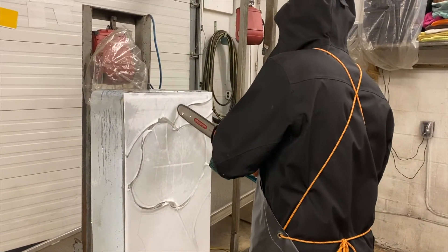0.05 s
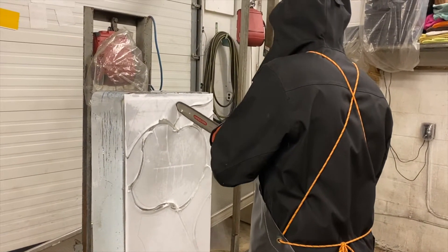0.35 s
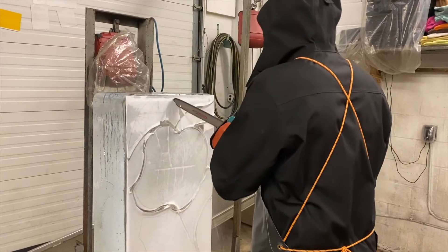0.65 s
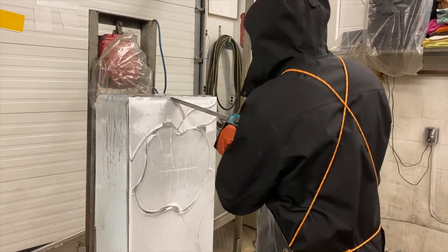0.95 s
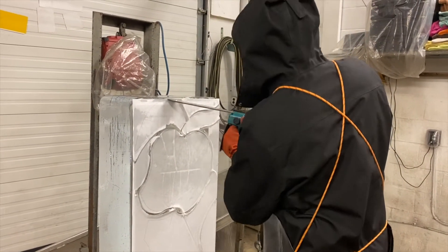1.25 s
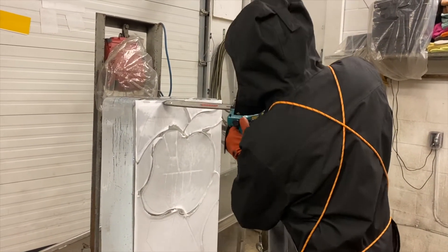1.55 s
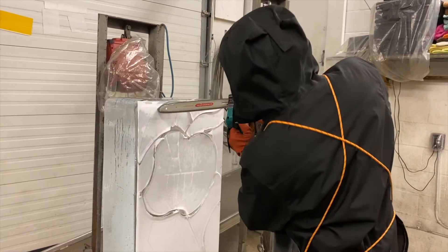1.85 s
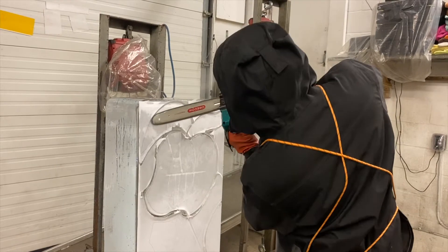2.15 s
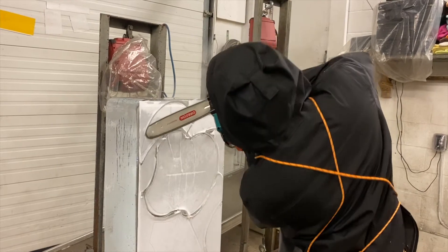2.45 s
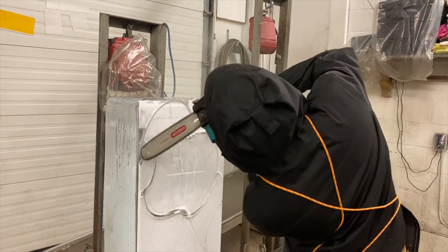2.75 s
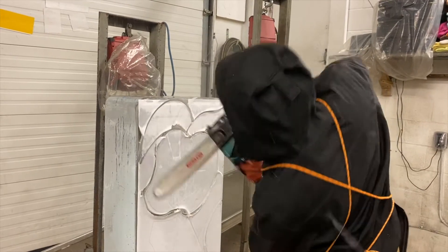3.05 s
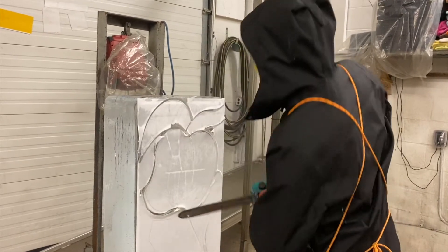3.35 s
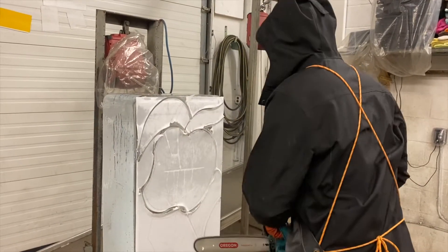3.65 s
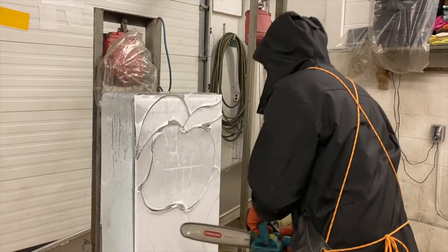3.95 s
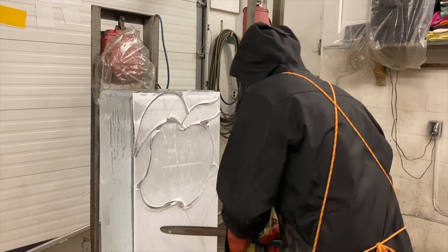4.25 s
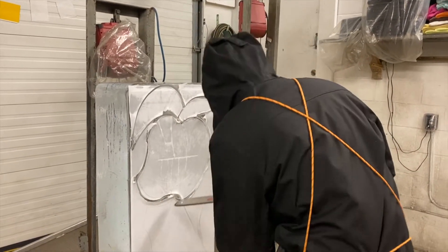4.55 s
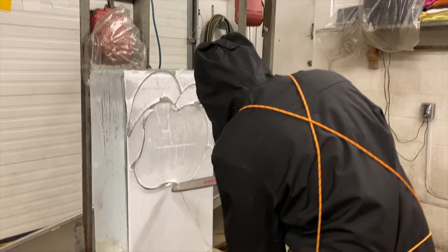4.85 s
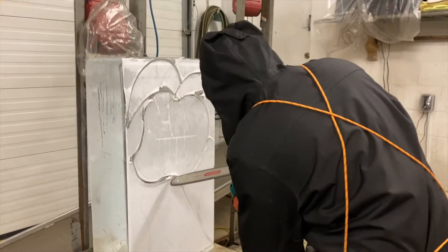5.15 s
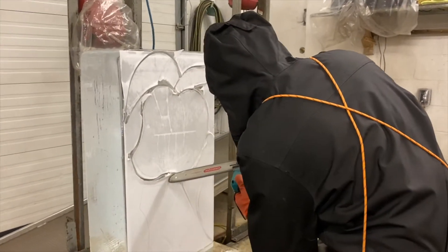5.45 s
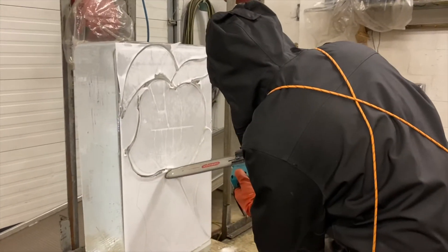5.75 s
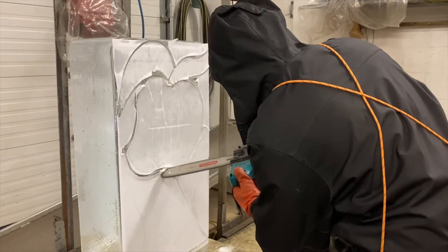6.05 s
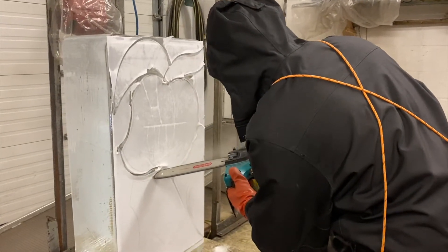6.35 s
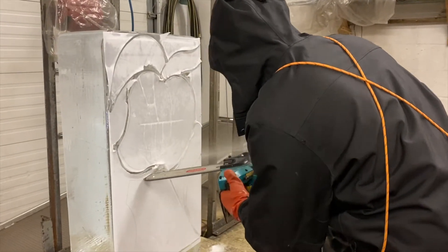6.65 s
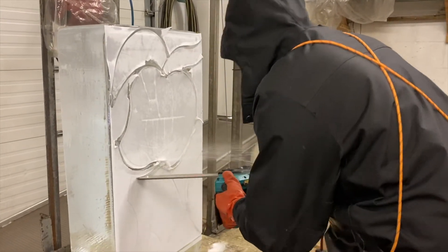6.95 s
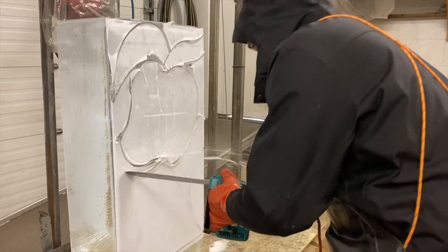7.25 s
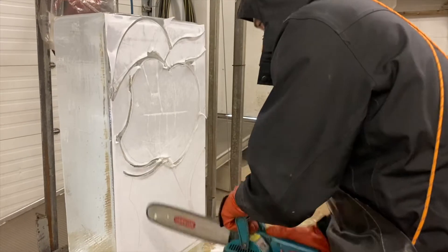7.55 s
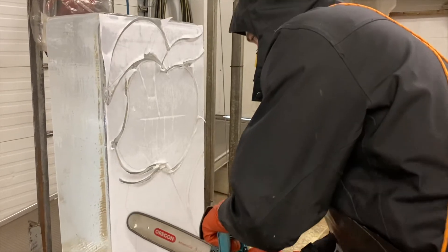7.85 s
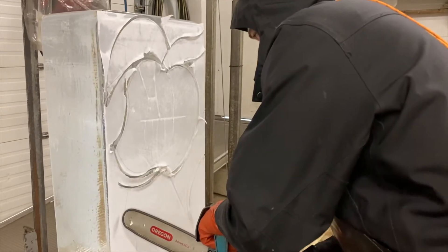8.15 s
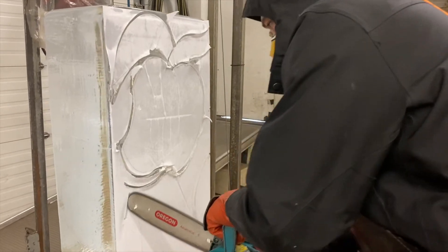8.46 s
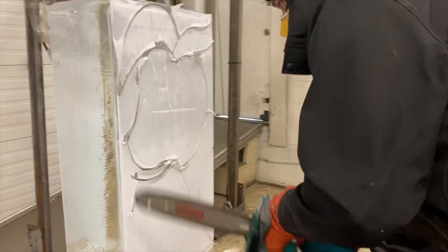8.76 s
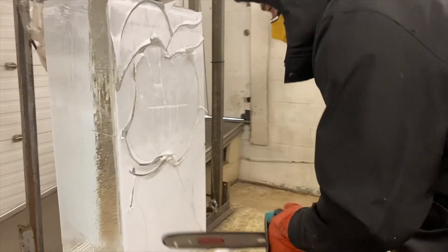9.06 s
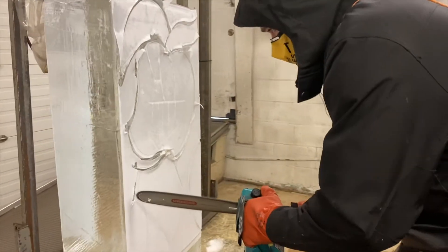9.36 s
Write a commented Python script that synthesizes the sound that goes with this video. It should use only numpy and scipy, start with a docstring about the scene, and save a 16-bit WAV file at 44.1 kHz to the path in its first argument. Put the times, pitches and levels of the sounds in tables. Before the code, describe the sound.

Close by in a workshop, an electric chainsaw runs through ice, its whine swelling and fading over metallic rattling and a fine spray of chips. The trigger is let go three times: first a longer sag in pitch and level, later a tiny dip, then a short one, and each time the motor quickly picks up again. The hard walls add a tight echo, with faint hum and low room rumble behind.

```python
"""An electric chainsaw carves a block of ice in a hard-walled workshop, about a metre and a half away.
Periodic impacts of chain on sprocket make a whine, which the mains ripple modulates into sidebands.
Friction and knocks excite the modes of bar and housing, and the cutters throw a hiss of ice chips.
Three times the trigger is let go: pitch and level sag, then recover as the motor spins up.
Mains hum and the low rumble of the room lie underneath."""
import sys
import numpy as np
from scipy import signal
from scipy.fft import rfft, irfft, next_fast_len
from scipy.io import wavfile

SR = 44100
rng = np.random.default_rng(int(sys.argv[2]) if len(sys.argv) > 2 else 0)


def store_wav(level_fs):
    """Save 16-bit WAV to argv[1]."""
    pcm = np.round(np.clip(np.atleast_2d(level_fs), -1, 1) * 32767)
    wavfile.write(sys.argv[1], SR, pcm.T.astype(np.int16))


N = 422919
T = np.arange(N) / SR
SIZE = next_fast_len(N + SR)
FREQS = np.maximum(np.arange(SIZE // 2 + 1) * SR / SIZE, 1)


# Speed under power, sagging with the load. Each row: time in seconds, links per second.
POWERED_RATE = [(0.0, 651.5), (0.75, 636.5), (1.3, 639.3), (1.9, 648.0), (2.8, 637.2), (4.3, 651.5),
                (4.7, 657.5), (5.0, 662.3), (5.7, 662.5), (6.2, 651.4), (7.28, 637.2), (8.15, 655.3),
                (8.55, 642.1), (9.59, 650.6)]
# Trigger releases. Each row: time let go and time pulled again, in seconds.
TRIGGER_RELEASES = [(2.812, 3.726), (7.32, 7.43), (8.524, 8.848)]

def chain_speed(coast_s=1.118, spin_up_s=0.219):
    """Inertia: speed decays and recovers exponentially. Gives links per second and share of full speed."""
    share = 1
    for let_go, pulled in TRIGGER_RELEASES:
        lost = 1 - np.exp(-np.clip(T - let_go, 0, pulled - let_go) / coast_s)
        share = share * (1 - lost * np.exp(-np.maximum(T - pulled, 0) / spin_up_s))
    return in_time(POWERED_RATE)[0] * share, share


# The whine swells and fades as the saw is turned. Each row: time in seconds, relative level in dB.
MESH_LEVEL = [(0, -33), (0.37, -29), (0.48, -41), (0.68, -35), (0.9, -43), (1.2, -31.5), (1.5, -39),
              (2.3, -31), (2.5, -35), (2.8, -27.5), (3.0, -33), (3.12, -34), (3.9, -32), (4.4, -29),
              (4.52, -31), (4.62, -25.5), (4.77, -21.5), (4.92, -26), (5.1, -28), (5.25, -25), (5.45, -27),
              (5.6, -26.5), (5.72, -31), (5.82, -26.5), (6.05, -29), (6.22, -43), (6.48, -31), (6.9, -27),
              (7.3, -29.5), (7.55, -39), (7.7, -31), (8.05, -27), (8.4, -35), (8.62, -31), (8.79, -24.5),
              (8.9, -34), (9.0, -29), (9.25, -34), (9.45, -26), (9.59, -33)]
# Upper sidebands. Each row: time in seconds, relative level in dB.
SIDEBAND_LEVEL = [(0, -43), (0.4, -42), (0.8, -52), (1.12, -39), (1.35, -46), (1.63, -39), (1.85, -50),
                  (2.15, -41), (2.7, -42), (2.92, -35), (3.1, -42), (3.7, -39), (4.0, -35), (4.15, -27),
                  (4.35, -33), (4.55, -38), (5.3, -36.5), (5.7, -39), (6.5, -37), (7.0, -40), (7.5, -38),
                  (7.85, -26), (8.02, -31), (8.2, -26.5), (8.58, -29.5), (8.8, -38), (9.1, -31), (9.3, -32),
                  (9.59, -43)]
# Width as the saw moves. Each row: time in seconds, half the phase between the ears in radians.
MESH_SKEW = [(0, 0.67), (1.6, 0.7), (2, 0.28), (4.8, 0.5), (5.3, 1.0), (5.6, 0.7), (6.1, 0.5), (6.95, 0.15),
             (7.2, 0.6), (8.3, 0.95), (8.7, 0.47)]
# The chain jumps on the sprocket and the whine dips. Each row: time and half width in seconds.
CHAIN_JUMPS = [(1.46, .05), (2.48, .04), (4.22, .022), (4.33, .018), (4.48, .018), (4.59, .025),
               (6.39, .03), (7.14, .03), (7.75, .025), (7.83, .008), (7.93, .024), (8.07, .013),
               (8.24, .018), (8.32, .008), (8.39, .02), (8.72, .018), (8.86, .02), (8.97, .025),
               (9.21, .03), (9.33, .014)]

def whine(links, slack, free, speed_db, rattle_db, flutter_db=2, jump_db=-11):
    """Modulation: two rivets a link strike the sprocket, and mains ripple adds sidebands to that tone."""
    mesh, ripple = 2 * links, RIPPLE_HZ * T
    mesh_db = in_time(MESH_LEVEL)[0] + 3.7 * speed_db
    upper_db = in_time(SIDEBAND_LEVEL)[0] + 2.3 * speed_db
    lower_db = rattle_db - 12 + 2.3 * speed_db
    skew, = in_time(MESH_SKEW)
    flap = FLAP * slack
    out = from_db(mesh_db + 0.5) * tone(mesh, scatter=0.1 + flap, scatter_hz=28, skew=skew)
    out += from_db(upper_db + 1) * tone(mesh + ripple, scatter=0.35 + flap, scatter_hz=25)
    out -= from_db(lower_db) * tone(mesh - ripple, scatter=0.6 + flap, scatter_hz=11)
    out += from_db(upper_db - 16) * tone(mesh + 2 * ripple, scatter=0.5 + flap, scatter_hz=26)
    flutter = flutter_db * free * drift(25)
    dips = swells([(s, width, jump_db) for s, width in CHAIN_JUMPS])
    return out * from_db(flutter + dips + slack_loss_db(slack))


RIPPLE_HZ = 120
FLAP = 1.5   # scatter that a flapping chain adds per unit of slack

def slack_loss_db(slack):
    """Loss of periodicity: past a threshold of slack, the steady tones fade."""
    return -35 * np.maximum(slack - 0.19, 0)


# Swells of the octave. Each row: time and half width in seconds, level at full speed in dB.
OCTAVE_LEVEL = [(0.5, .06, -40.5), (0.8, .2, -35), (1.42, .17, -40.5), (2.2, .22, -41.5),
                (2.72, .13, -42.5), (3.2, .22, -39), (4.68, .08, -35), (5.0, .13, -32), (5.3, .1, -36.5),
                (5.78, .08, -39), (6.3, .2, -35.5), (6.76, .09, -33.5), (7.12, .17, -37), (8.15, .25, -38),
                (8.76, .09, -28), (9.25, .28, -33.5)]

def whine_octave(links, slack, speed_db):
    """Harmonics: periodic impacts also sound at twice the meshing frequency."""
    level = swells_db(OCTAVE_LEVEL) * from_db(1.5 * speed_db)
    return level * tone(4 * links, scatter=0.3 + FLAP * slack, scatter_hz=30, skew=0.3)


# Spectrum of the scraping links. Each row: frequency in Hz, relative density in dB.
SCRAPE_SPECTRUM = [(400, -23), (900, -7), (1200, 4), (1700, 3.5), (2000, 3.5), (2400, 3.5), (3000, -1),
                   (3400, -1), (4000, -0.5), (4800, 2), (6000, -15), (7500, -5.5), (10000, -114)]

def chain_rattle(links, rattle_db, bar_db):
    """Impact excitation: each link scrapes and knocks in the groove, setting bar and housing ringing."""
    knocks = from_db(1.8 * np.cos(2 * np.pi * links) + 0.74 * drift(14.5))
    metal = fine_modes(depth_db=2.1, spacing_hz=45)
    scrape = from_db(rattle_db + 1.87) * stereo_noise(metal * from_db(over_hz(SCRAPE_SPECTRUM)), knocks)
    ring = from_db(rattle_db - 2.0) * stereo_noise(saw_body(), knocks)
    bar = from_db(bar_db + 1) * stereo_noise(metal * resonance(5400, 750) ** 2, knocks)
    # the upper ring of the bar faces the left ear
    lean_db = over_hz([(2000, 0.09), (3000, 1.8), (5200, 1.2), (6200, 0.75)])
    return filtered(scrape + ring + bar, from_db([lean_db, -lean_db]))


# Modes of bar and housing. Each row: frequency in Hz, bandwidth in Hz, relative gain in dB.
BODY_MODES = [(641, 40, -8), (1293, 120, 2.5), (1445, 310, -2), (1800, 70, -9.5), (1937, 76, -5),
              (2157, 120, -2.5), (2782, 72, 1.5), (2977, 57, 0), (3105, 41, 2.5), (3590, 100, -6.5),
              (3740, 52, -9), (5560, 200, -7.5), (6220, 44, 0)]

def saw_body():
    """Modal superposition: the modes respond in parallel, with alternating signs."""
    return sum((-1) ** k * from_db(db) * resonance(hz, width)
               for k, (hz, width, db) in enumerate(BODY_MODES))


def fine_modes(depth_db, spacing_hz):
    """Modal overlap: crowded small modes of bar and housing ripple the spectrum."""
    knots = np.arange(0, SR / 2, spacing_hz)
    heights = rng.standard_normal(4096)[:len(knots)]
    return from_db(depth_db * np.interp(FREQS, knots, heights))


# Spectrum of the flying chips. Each row: frequency in Hz, relative density in dB.
CHIP_SPECTRUM = [(3500, -46), (5500, -2.5), (6500, 0.5), (7200, 1), (7800, 6), (8400, -2.5), (9400, -0.5),
                 (10500, 3.5), (12000, -0.5), (13200, 2), (14300, -0.5), (15700, -4)]

def ice_spray(links, spray_db, lag_ms=0.2225):
    """Amplitude-modulated noise: a cutter on every second link shaves off chips in uneven bites."""
    bites = from_db(0.4 * np.cos(np.pi * links) + 0.64 * drift(36) + 0.098 * drift(15))
    hiss = filtered(rng.standard_normal(N) * bites, from_db(over_hz(CHIP_SPECTRUM)))
    right = from_db(spray_db + 8.5) * rms_one(hiss)
    # an inverted, slightly late copy widens the hiss
    left = -filtered(right, np.exp(-2j * np.pi * FREQS * lag_ms / 1000))
    return np.array([left, right])


# The motor's low tone. Each row: time in seconds, level at full speed in dB.
MOTOR_TONE_LEVEL = [(0, -45), (1.0, -48.5), (2.7, -49.5), (3.0, -46), (3.2, -53), (3.9, -52), (4.35, -44.5),
                    (4.8, -47.5), (5.6, -47.5), (6.2, -54), (7.4, -53), (8.2, -51), (9.0, -52), (9.59, -47)]
# Sprocket tones. Each row: multiple of the link rate, relative level in dB.
SPROCKET_ORDERS = [(2.333, -16), (2.667, -22), (3, -18), (4.333, -15), (4.667, -19), (5, -18), (5.333, -17),
                   (6, -16), (7, -20), (9.333, -21)]

def drive_tones(links, slack, speed_db, rattle_db):
    """Rotational orders: motor and sprocket sound at set multiples of the link rate."""
    motor_db = in_time(MOTOR_TONE_LEVEL)[0] + 2 * speed_db + slack_loss_db(slack)
    motor = from_db(motor_db) * tone(1.01 * links, scatter=0.25, scatter_hz=6)
    buzz = sum(from_db(db) * tone(order * links, scatter=1, scatter_hz=7)
               for order, db in SPROCKET_ORDERS)
    return motor + from_db(rattle_db + speed_db) * buzz


def bar_song(links, slack, bar_db, held_bar_db, order=13 / 3):
    """Forced vibration: free of the cut, the bar sings one order of the drive through its modes."""
    excess = np.maximum(from_db(bar_db) - from_db(held_bar_db), 0)
    song = excess * tone(order * links, scatter=1, scatter_hz=35)
    return filtered(from_db(2.5 - 25 * slack) * song, saw_body())


# Squeals as the saw slows or picks up. Each row: time and half width in seconds, pitch in Hz, level in dB.
SLACK_SQUEALS = [(3.03, .05, 2135, -32), (3.06, .035, 3070, -42), (3.21, .035, 1790, -40),
                 (3.37, .06, 3030, -43), (3.5, .2, 5580, -50), (3.88, .06, 2850, -37),
                 (8.77, .06, 3050, -39), (9.03, .06, 2135, -35)]

def squeals(share, bend_power=0.35):
    """Resonance: the slack chain squeals near a mode of the housing, its pitch bent by changing speed."""
    out = 0
    for s, width, hz, db in SLACK_SQUEALS:
        pitch = hz * (share / np.interp(s, T, share)) ** bend_power
        squeal = tone(np.cumsum(pitch) / SR, scatter=0.45, scatter_hz=50, skew=0.3)
        out = out + swells_db([(s, width, db)]) * squeal
    return out


# A narrow rasping ring near 4.5 kHz swells and fades. Each row: time and half width in seconds, level in dB.
RASP_SWELLS = [(1.8, 1.2, -50), (4.1, .25, -46), (5.1, .5, -43), (6.3, .6, -41.5), (9.45, .25, -42)]

def groove_ring():
    """Frictional excitation: the bar rubs the walls of its groove and rings in one narrow, rasping band."""
    return swells_db(RASP_SWELLS) * stereo_noise(resonance(hz=4540, width_hz=190) ** 2)


# Spectrum of the housing. Each row: frequency in Hz, relative density in dB.
HOUSING_SPECTRUM = [(90, -40), (170, -20), (230, -7.5), (290, -8.5), (360, -4.5), (480, -1), (620, 5.5),
                    (760, 3.5), (1000, 4.5), (1400, -22.5), (2500, -66)]

def housing_noise(rattle_db):
    """Structure-borne sound: the housing radiates a low noise that follows the rattle."""
    return from_db(rattle_db - 12) * stereo_noise(from_db(over_hz(HOUSING_SPECTRUM)))


def sprocket_drone(links, slack):
    """Periodic forcing: the six-toothed sprocket shakes the housing twice a turn."""
    return from_db(-68.5 - 20 * slack) * tone(links / 3, scatter=0.7, scatter_hz=9, skew=0.3)


def workshop_echo(x, t60=0.14, wet_db=-12):
    """Reverberation: the hard walls add a diffuse, exponentially decaying tail at each ear."""
    age = T[:SR]
    tail = rng.standard_normal((2, SR)) * from_db(-60 * age / t60) * (age > 0.006)
    tail /= np.sqrt(np.sum(tail ** 2, axis=1, keepdims=True))
    return x + from_db(wet_db) * filtered(x, rfft(tail, SIZE))


# Mains hum. Each row: frequency in Hz, level in dB.
HUM_PARTIALS = [(120, -72), (240, -73)]
# Spectrum of the room air. Each row: frequency in Hz, relative density in dB.
AIR_SPECTRUM = [(27, -40), (42, -5), (60, 9), (100, 0), (160, -1), (300, -21), (1000, -32)]
# Swells of low rumble. Each row: time and half width in seconds, level in dB.
AIR_RUMBLES = [(2.42, 0.25, -68), (3.57, 0.24, -67)]

def room_floor(air_db=-71):
    """Ambient noise: harmonics of the mains over the low air of the room, which swells twice."""
    hum = sum(from_db(db) * rms_one(np.sin(2 * np.pi * hz * T)) for hz, db in HUM_PARTIALS)
    level = from_db(air_db) + swells_db(AIR_RUMBLES)
    return hum + level * stereo_noise(from_db(over_hz(AIR_SPECTRUM)))


# Likeness of the two ears. Each row: frequency in Hz, correlation from 0 to 1.
EAR_COHERENCE = [(60, 0.92), (150, 1), (300, 0.85), (650, 0.45), (1300, 0.14), (2200, 0.14), (4000, 0.46),
                 (5500, 0.15), (7000, 0.071)]

def stereo_noise(response, drive=1):
    """Interaural coherence: shaped noise, alike at both ears in the bass and diffuse higher up; rms 1."""
    alike = np.clip(over_hz(EAR_COHERENCE), -1, 1)
    noise = rng.standard_normal((2, N)) * drive
    mid, side = filtered(noise, response * np.sqrt([1 + alike, 1 - alike]))
    return rms_one(np.array([mid + side, mid - side]))


def tone(turns, scatter, scatter_hz, skew=0.44):
    """Random modulation: a wavering partial, about 2 x skew radians apart at the ears; rms 1."""
    waver = drift(scatter_hz) + 1j * drift(scatter_hz)
    phasor = (1 + scatter * waver) / np.sqrt(1 + 2 * scatter ** 2)
    apart = skew + 0.25 * drift(1.5)
    angle = 2 * np.pi * turns + np.angle(phasor)
    return rms_one(np.abs(phasor) * np.cos([angle - apart, angle + apart]))


def drift(hz, step=40):
    """Low-passed noise: a slow random fluctuation with spread 1."""
    pole = np.exp(-2 * np.pi * step * hz / SR)
    noise = rng.standard_normal(N // step + 2002)
    slow = signal.lfilter([1], [1, -2 * pole, pole * pole], noise)[2000:]
    return np.interp(np.arange(N) / step, np.arange(len(slow)), rms_one(slow))


def resonance(hz, width_hz):
    """Damped oscillator: the response of one mode, gain 1 at its peak."""
    return 1 / (1 + 1j * (FREQS ** 2 - hz ** 2) / (FREQS * width_hz))


def filtered(x, response):
    """Convolution, as a product of spectra."""
    return irfft(rfft(x, SIZE) * response, SIZE)[..., :N]


def swells(rows):
    """Sum of Gaussian bells, each given by time, half width and height."""
    return sum(height * np.exp(-((T - s) / width) ** 2) for s, width, height in rows)


def swells_db(rows):
    """Gaussian bells with heights given in dB."""
    return swells([(s, width, from_db(db)) for s, width, db in rows])


def in_time(rows):
    """Linear interpolation of each column at every sample."""
    s, *columns = np.transpose(rows)
    return [np.interp(T, s, c) for c in columns]


def over_hz(points):
    """Interpolation on a log-frequency axis."""
    hz, value = np.transpose(points)
    return np.interp(np.log(FREQS), np.log(hz), value)


def from_db(db):
    """Decibels to gain."""
    return 10 ** (np.asarray(db) / 20)


def rms_one(x):
    """Normalisation to rms 1."""
    return x / np.sqrt(np.mean(np.abs(x) ** 2) + 1e-20)


# The cut is louder once the carver no longer stands in the way.
# Each row: time in seconds, relative levels of chain rattle and of ice spray in dB.
CUT_LEVELS = [(0, -32.5, -37), (2, -33, -39), (3.45, -32, -38), (3.8, -27.5, -33.5), (4.25, -30, -35.5),
              (5.3, -29.5, -33.5), (6.6, -30, -34.5), (8.15, -28, -33.5), (9.59, -30, -35)]
# The bar comes clear of the groove. Each row: time and half width in seconds, freedom from 0 to 1.
BAR_FREEDOM = [(4.07, 0.15, 0.43), (7.42, 0.11, 0.46), (8.35, 1, 0.4), (8.61, 0.029, 0.22),
               (8.87, 0.22, 0.22)]

def scene(taut_rate=690):
    """Superposition: the saw, its pitch and level led by chain speed, over the hum and air of the room."""
    link_rate, share = chain_speed()
    speed_db = 20 * np.log10(share)   # k * speed_db makes an amplitude grow as speed to the power k
    links = np.cumsum(link_rate * (1 + 0.00081 * drift(7.23))) / SR   # count of links passed
    slack = np.maximum(1 - link_rate / taut_rate, 0)
    free = swells(BAR_FREEDOM)
    cut_db, spray_db = in_time(CUT_LEVELS)
    rattle_db = cut_db + 1.31 * speed_db + 2 * free
    held_bar_db = rattle_db - 10
    bar_db = held_bar_db + 17.5 * free
    housing = housing_noise(rattle_db)
    tones = whine(links, slack, free, speed_db, rattle_db) + whine_octave(links, slack, speed_db)
    tones += drive_tones(links, slack, speed_db, rattle_db) + bar_song(links, slack, bar_db, held_bar_db)
    tones += squeals(share) + sprocket_drone(links, slack)
    saw = workshop_echo(tones) + chain_rattle(links, rattle_db, bar_db) + groove_ring() + housing
    return saw + ice_spray(links, spray_db + 1.9 * speed_db) + room_floor()


def record(dry, low_cut_hz=48, high_cut_hz=15800):
    """Band limiting: the microphone loses the deepest bass, and the top is cut steeply."""
    thinned = signal.sosfilt(signal.butter(2, low_cut_hz, "high", fs=SR, output="sos"), dry)
    return signal.sosfiltfilt(signal.ellip(10, 0.05, 60, high_cut_hz, fs=SR, output="sos"), thinned)


dry = scene()
out = record(dry)
store_wav(out)
```